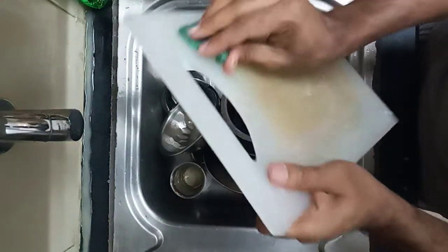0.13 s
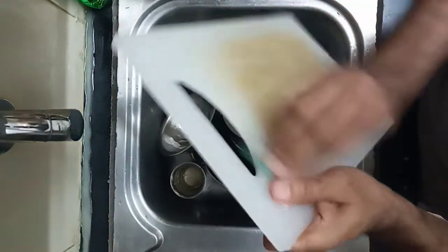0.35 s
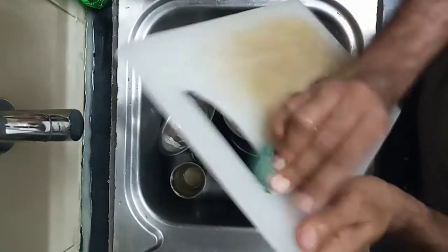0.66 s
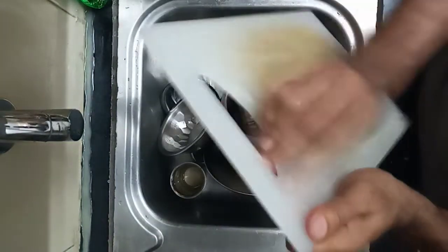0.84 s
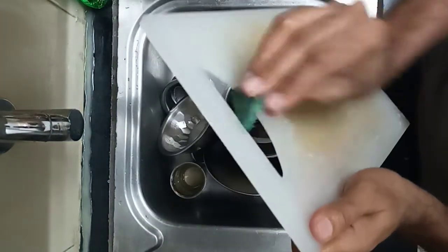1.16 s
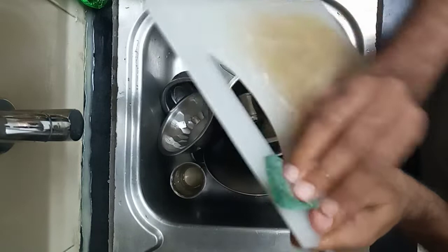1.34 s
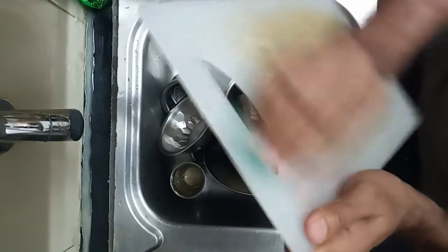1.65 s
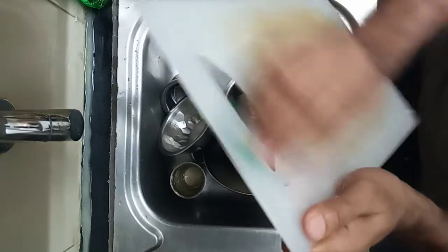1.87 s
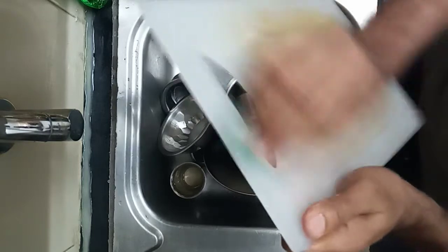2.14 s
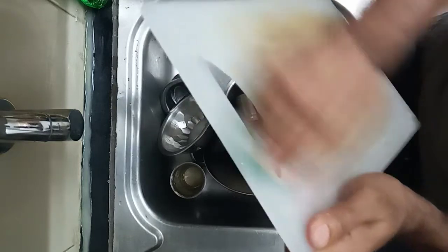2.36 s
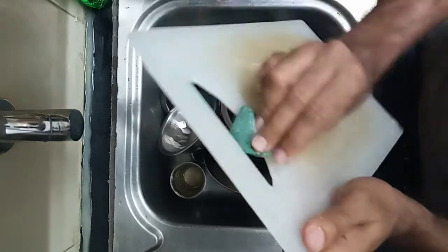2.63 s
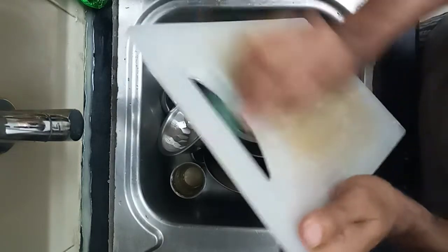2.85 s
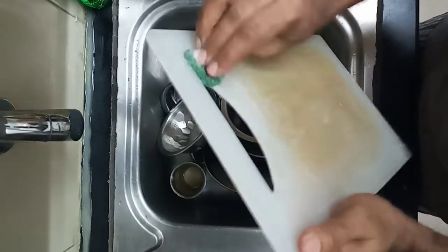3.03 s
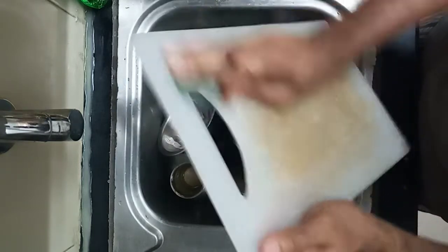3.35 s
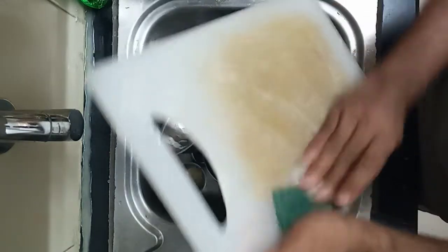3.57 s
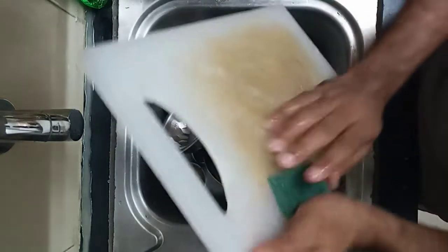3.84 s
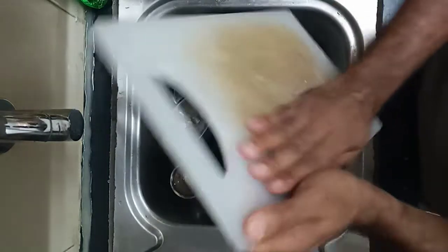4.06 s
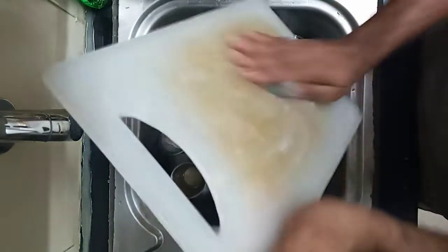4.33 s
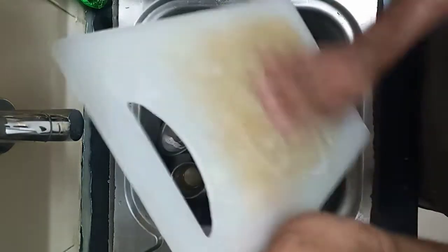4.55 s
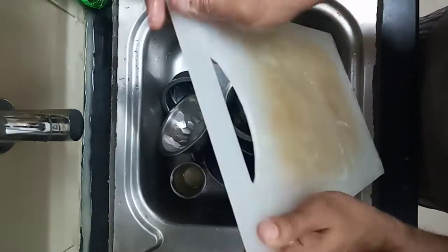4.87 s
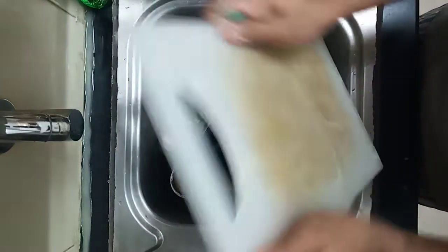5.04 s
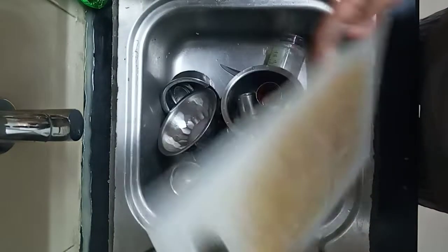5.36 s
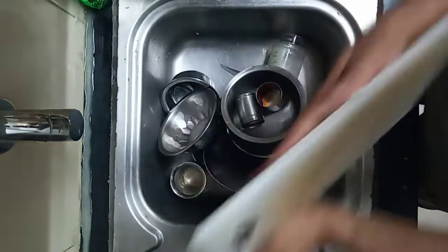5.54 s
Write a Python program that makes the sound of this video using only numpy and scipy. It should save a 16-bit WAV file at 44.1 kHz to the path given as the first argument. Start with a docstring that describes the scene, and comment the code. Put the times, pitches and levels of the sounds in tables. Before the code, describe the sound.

Brisk hissing scrub strokes on a plastic chopping board above a steel sink, pausing briefly, then long wet wipes with skin squeaks and knocks.

```python
"""A scouring pad goes quickly to and fro over a wet plastic chopping board, heard from close above a steel sink.
Then long wipes follow; the board also grates on the rim, knocks, and squeaks or rasps under wet skin.
Rubbing is made of tiny random slips, filtered to follow speed, pressure and the hollow under the hand.
Sink and small kitchen ring along with it; under it all throbs a low drone, like an engine outdoors,
made of one swelling tone and filtered noise."""
import sys
import numpy as np
from scipy import signal
from scipy.fft import rfft, irfft
from scipy.io import wavfile
from scipy.ndimage import uniform_filter1d

SR = 44100
rng = np.random.default_rng(int(sys.argv[2]) if len(sys.argv) > 2 else 0)


def bounce(signal):
    """Save signal as a 16-bit WAV file at the path given by the first command-line argument."""
    frames = np.transpose(np.atleast_2d(signal))
    limited = np.clip(frames, -1, 1)
    pcm = np.round(limited * 32767).astype(np.int16)
    wavfile.write(sys.argv[1], SR, pcm)


N = 251370
TIME = np.arange(N) / SR
SCRUB_END_S = 3.115  # the last quick stroke ends here


def amp(db):
    """Turns decibels into gain."""
    return 10 ** (np.asarray(db) / 20)


def unit(x):
    """Scales a sound to rms 1."""
    return x / np.sqrt(np.mean(x ** 2) + 1e-20)


def read(points, hz):
    """Reads a curve of frequency points, spaced as the ear hears pitch (log frequency)."""
    f, value = np.transpose(points)
    return np.interp(np.log(hz + 1), np.log(f + 1), value)


def follow(rows, t):
    """Reads every column of a time curve at the times t."""
    s, *columns = np.transpose(rows)
    return [np.interp(t, s, column) for column in columns]


def colour(x, points, share=1):
    """Filters a sound by a share of a spectrum in dB."""
    hz = np.fft.rfftfreq(2 * N, 1 / SR)
    gain = amp(share * read(points, hz))
    return irfft(rfft(x, 2 * N) * gain)[..., :N]


def wander(rate_hz):
    """Random drift of rms 1, with little movement faster than the given rate."""
    hz = np.fft.rfftfreq(N, 1 / SR)
    spectrum = rfft(rng.standard_normal(N)) / (1 + (hz / rate_hz) ** 4)
    return unit(irfft(spectrum, N))


def add(mix, s, sound):
    """Mixes a sound in at time s."""
    part = mix[:, max(round(s * SR), 0):][:, :sound.shape[-1]]
    part += sound[..., :part.shape[1]]


def swell(t, start, rise, hold, release_db_per_s):
    """Gain of one slide: a smooth rise, a hold, then a steady fall in dB."""
    attack = np.sin(np.pi / 2 * np.clip((t - start) / max(rise, .001), 0, 1)) ** 2
    return attack * amp(-release_db_per_s * np.maximum(t - start - rise - hold, 0))


# Quick strokes, to and fro in turn, each lasting until the next:
# (start [s], level [dB], fastest moment [share of the stroke], body at the start [dB], fizz [dB],
#  hollow under the hand [Hz], its glide [octaves])
QUICK_STROKES = [(0.01, -29.5, 0.42, -3.5, -6, 1570, 1.1), (0.167, -33.5, 0.5, -3, -1, 2140, 0.7),
                 (0.313, -32.5, 0.58, -5.5, -0.5, 1840, -0.2), (0.42, -34, 0.43, -6.5, -1, 2020, 0.2),
                 (0.542, -39, 0.28, -0.5, 0, 1510, 0), (0.653, -42.5, 0.2, -13.5, -2, 1450, -2),
                 (0.76, -59.5, 0.13, -13, -7, 1500, -0.21), (0.979, -57.5, .9, 2, 2, 1600, -4.5),
                 (1.087, -38, 0.64, -6.5, -1.5, 2180, 2.2), (1.24, -35.5, 0.4, -8.5, -1, 2200, -2.5),
                 (1.369, -36, .54, -4, -1, 2040, 1.8), (1.488, -34.5, .3, -12, -3, 1830, 0.1),
                 (1.609, -35, 0.43, -8, 0, 2880, 0.8), (1.723, -34, 0.19, -5, -.5, 2540, -2.2),
                 (1.834, -36, 0.38, -10, -1.5, 2540, 0.4), (1.952, -34.5, 0.098, -10, -4.5, 2050, 0),
                 (2.069, -33.5, 0.36, -10.5, -1, 2750, 0.8), (2.272, -35.5, 0.36, -9, -2.5, 1892, -2),
                 (2.429, -38, 0.29, -7.5, -3, 1940, 1.3), (2.55, -38.5, 0.47, -10, -2, 1965, 1.5),
                 (2.676, -38, 0.29, -6, 0.5, 2200, 2.2), (2.839, -44.5, 0.33, -6, -6.5, 2800, 0),
                 (2.998, -39.5, 0.63, -5.5, -2.5, 2750, -1.1)]
SETTLE_S, SETTLE_DB = 0.079, -11.5  # the pad first settles on the board
BITE, BRAKE, TURN_SPEED = 2.12, 1.38, 0.14  # curvature of run-up and slowing; speed left at the turn
BODY_GROWTH_DB = 9.5  # the board's body grows over a stroke
FIZZ_PER_SPEED = 0.12  # dB of fizz per dB of speed


def scrubbing():
    """The pad bites quickly and slows again in every stroke; it hisses at speed and growls as it is braked."""
    u = np.linspace(0, 1, num=41)[:-1]  # progress through one stroke
    rows = []
    ends = [row[0] for row in QUICK_STROKES[1:]] + [SCRUB_END_S]
    for stroke, end in zip(QUICK_STROKES, ends):
        start, db, crest, body_db, fizz_db, hollow_hz, glide_oct = stroke
        crest = np.clip(crest, .1, .9)
        speed = np.sin(np.pi * np.interp(u, [0, crest, 1], [0, .5, 1]))
        curvature = np.where(u < crest, BITE * crest, BRAKE)
        speed_db = 20 * np.log10(TURN_SPEED + speed ** curvature)
        glide = glide_oct * -np.cos(np.pi * u) / 2
        rows += list(zip(start + u * (end - start),
                         db + speed_db,
                         body_db + BODY_GROWTH_DB * u,
                         fizz_db + FIZZ_PER_SPEED * speed_db,
                         hollow_hz * 2 ** glide))
    slips = fibres(per_s=9000, spread_db=2.13, judder_db=0.94, likeness=0.18)
    rasp = rub(slips, *np.transpose(rows), hollow_db=4, drift_db=4.2)
    landing = amp(np.interp(TIME, [0, SETTLE_S], [SETTLE_DB, 0]))
    return rasp * landing * amp([[-.8], [.7]])


# Long wipes: (start [s], rise [s], hold [s], level [dB], body at full speed [dB], fizz [dB],
#  hollow under the hand at full speed [Hz], its strength [dB])
LONG_WIPES = [(3.092, 0.12, 0.033, -33.5, 2.5, -3.5, 1830, 3.5),
              (3.27, 0.034, 0.046, -46.5, -10.5, -1.5, 1480, 13),
              (3.569, 0.0046, 0.0071, -54, 4, 3.5, 1777, 3), (3.678, 0.041, 0.0028, -50.5, 2.5, 3, 1600, 3),
              (3.745, 0.13, 0.11, -34.5, -1.5, -0.5, 2140, 0.5),
              (3.977, 0.065, 0.092, -34.5, 8, -3, 2515, 6), (4.13, 0.045, 0.072, -36, 0.5, -5, 1550, 2),
              (4.256, 0.071, 0.056, -34, 0, -2, 2000, 7.5), (4.411, 0.029, 0.076, -41.5, -4.5, -4, 1820, 7),
              (4.689, 0.1, 0.04, -36.5, 4, 1, 2110, 4.5), (4.889, 0.05, 0.091, -49, -6, 1, 1880, 7.5),
              (5.144, 0.0094, 0.03, -38, -2.5, -8.5, 1700, 4.5),
              (5.171, 0.077, 0.093, -38, -5, -3.5, 1860, 8.5),
              (5.326, 0.14, 0.071, -38.5, 4.5, -2.5, 2870, 3.5), (5.537, 0.02, 0.095, -42, -5, -1, 2400, 5)]
WIPE_RELEASE_DB_PER_S = 217  # the hand eases off
WIPE_GLIDE_OCT_PER_S = -0.66  # its hollow opens as it goes
WIPE_BODY_DB_PER_S = 15  # the hand leans in as the sweep goes on
RESTING_DB, FIDGET_DB = -70, 1.5  # the hand never lies quite still on the board


def wiping():
    """Pad and palm rub the wet plastic in long sweeps, heard right of the middle and drifting towards it."""
    t = np.arange(SCRUB_END_S, N / SR, .002)
    start, rise, hold, db, body_db, fizz_db, hollow_hz, hollow_db = np.transpose(LONG_WIPES)[:, :, None]
    swells = [swell(t, *row[:3], WIPE_RELEASE_DB_PER_S) for row in LONG_WIPES]
    power = (amp(db) * swells) ** 2 + 1e-20
    age = np.clip(t - start - rise, -rise, hold)  # time since the sweep reached full speed
    tones = (body_db + WIPE_BODY_DB_PER_S * age,
             fizz_db,
             hollow_hz * 2 ** (WIPE_GLIDE_OCT_PER_S * age),
             hollow_db)
    # where sweeps overlap, the louder one sets the colour
    tone = [(column * power).sum(0) / power.sum(0) for column in tones]
    resting = amp(RESTING_DB + FIDGET_DB * np.interp(t, TIME, wander(10)))
    level_db = 10 * np.log10(power.sum(0) + resting ** 2)
    slips = fibres(per_s=12000, spread_db=2.5, judder_db=.5, likeness=0.2)
    sweep = rub(slips, t, level_db, *tone, drift_db=4.2)
    pan_db = np.interp(TIME, [3.9, 5.2], [-2.4, -.5])  # left against right
    return sweep * amp(np.array([pan_db, -pan_db]) / 2)


def fibres(per_s, spread_db, judder_db, likeness):
    """Countless tiny slips of uneven size, bunched by the pad's judder; the ports share some of them."""
    slips = (rng.random((3, N)) < per_s / SR) * rng.choice([-1., 1.], (3, N))
    size_db = spread_db * np.minimum(rng.exponential(1, (3, N)), 5)
    slips = unit(slips * amp(size_db))
    same = np.clip(likeness, 0, 1)
    mixed = np.sqrt(same) * slips[2] + np.sqrt(1 - same) * slips[:2]
    return unit(mixed * amp(judder_db * wander(43)))


# Rasp of fibres on plastic: (frequency [Hz], level [dB per Hz])
FIBRE_RASP = [(200, -20), (450, -23), (720, -11), (1100, -5.5), (1500, -6), (4400, -2), (6600, -0.5),
              (8700, -8), (10600, -2), (13600, -17.5), (14800, -4.5)]
# lower edge of the rasp over a 2200 Hz hollow; how closely it follows the hollow
CUTOFF_HZ, CUTOFF_FOLLOW = 1092, 0.37
PRESS_DB_PER_OCT = 35  # pressing harder pulls that edge down


def rub(slips, t, level_db, body_db, fizz_db, hollow_hz, hollow_db, drift_db):
    """Pressure brings out the board's body, speed the fizz, the cupped hand a moving resonance."""
    hz, frames, z = signal.stft(slips, SR, nperseg=512, noverlap=384)
    controls = (body_db, fizz_db, hollow_hz, hollow_db)
    body, fizz, hollow, cupped = (np.interp(frames, t, c * np.ones_like(t)) for c in controls)
    f = hz[:, None] + 1
    shape_db = read(FIBRE_RASP, f) + body / (1 + (f / 2200) ** 4) + fizz / (1 + (8300 / f) ** 8)
    peak = np.exp(-(np.log(f / hollow) / .36) ** 2)
    # the hollow radiates little below this edge
    cutoff = CUTOFF_HZ * (hollow / 2200) ** CUTOFF_FOLLOW * 2 ** (-body / PRESS_DB_PER_OCT)
    below_db = -10 / (1 + (f / cutoff) ** 14)
    # as the pad travels, reflections off hand and steel favour ever other narrow bands, mostly low ones
    drift = uniform_filter1d(rng.standard_normal(z.shape[1:]), size=2, axis=0)
    drift = unit(uniform_filter1d(drift, size=12, axis=1))
    drift_shape_db = drift_db * drift / np.sqrt(1 + (f / 4000) ** 2)
    shape = amp(shape_db + cupped * peak + below_db + drift_shape_db)
    # the level is set by the band from 2.5 to 8 kHz
    shape /= np.sqrt((shape[(hz > 2500) & (hz < 8000)] ** 2).sum(0) / len(hz))
    rubbed = signal.istft(z * shape, SR, nperseg=512, noverlap=384)[1][:, :N]
    return rubbed * amp(np.interp(TIME, t, level_db, -120, -120))


# The board grates on the rim of the sink: (start [s], rise [s], hold [s], level [dB])
RIM_GRATES = [(0.044, 0.022, 0.021, -27.5), (0.126, 0.022, 0.33, -53), (0.463, 0.092, 0.056, -48),
              (0.622, 0.036, 0.6, -58)]
GRATE_RELEASE_DB_PER_S = 478
RIM_HZ, RIM_WIDTH_HZ, RIM_DB = 797, 20, -3  # the note of the rim; its level against the grating


def grating():
    """The board's edge stutters along the steel rim, which sings one narrow note."""
    slips = fibres(per_s=3000, spread_db=2, judder_db=2, likeness=.6)
    # (frequency [Hz], level [dB])
    tone = [(100, -62), (235, 9), (330, -8.5), (400, -1), (560, -8.5), (1500, -4.0), (12000, -15.5)]
    note = signal.lfilter(*signal.iirpeak(RIM_HZ, RIM_HZ / RIM_WIDTH_HZ, SR), slips)
    contact = sum(amp(db) * swell(TIME, start, rise, hold, GRATE_RELEASE_DB_PER_S)
                  for start, rise, hold, db in RIM_GRATES)
    return unit(unit(colour(slips, tone)) + amp(RIM_DB) * unit(note)) * contact


# Wet skin drags on the board:
# (start [s], length [s], level [dB], resonance from [Hz], resonance to [Hz], its width [Hz])
SKIN_SCRAPES = [(0.347, 0.024, -41.5, 800, 810, 6.7), (2.0, .06, -49.5, 1400, 1084, 150),
                (3.192, 0.022, -37, 1720, 1620, 1450), (3.226, 0.036, -36, 1465, 1456, 420),
                (3.585, 0.026, -52, 1054, 1040, 4.7), (4.32, 0.096, -40, 1350, 1260, 500),
                (4.92, 0.086, -48, 1770, 1960, 290), (5.151, 0.0557, -46, 1590, 1675, 290),
                (5.3, 0.2, -46.5, 1546, 1456, 420)]


def scrapes():
    """Wet skin drags on the board and excites one gliding resonance: narrow, it squeaks; wide, it rasps."""
    out = np.zeros((2, N))
    for start, length, db, from_hz, to_hz, width_hz in SKIN_SCRAPES:
        u = np.arange(0, length, 1 / SR) / length
        grit = (wander(width_hz / 2) + 1j * wander(width_hz / 2))[:len(u)]
        turn = np.exp(2j * np.pi * np.cumsum(from_hz + (to_hz - from_hz) * u) / SR)
        add(out, start, amp(db) * np.sqrt(np.sin(np.pi * u)) * unit((grit * turn).real))
    return out


# Knocks of the board:
# (time [s], level [dB], main ring [Hz], time to fall 60 dB [s], tick against the ring [dB])
BOARD_KNOCKS = [(0.077, -43, 238, 0.056, -8), (0.606, -37.5, 219, 0.082, -14), (2.6, -50.5, 644, 0.11, -8),
                (3.71, -54, 200, 0.24, -10), (5.168, -47, 640, 0.063, 4)]


def knocks():
    """Each knock of the board is a short scuff of noise and a cluster of close, fading tones."""
    out, t = np.zeros((2, N)), np.arange(SR // 2) / SR
    cluster = [(.92, 0.076), (1, 1), (1.06, 0.72), (1.17, 1)]  # (factor on the pitch, share)
    for s, db, hz, t60, tick_db in BOARD_KNOCKS:
        ring = sum(share * np.sin(2 * np.pi * (hz * factor * t + rng.random())) for factor, share in cluster)
        ring *= amp(-60 * t / t60) * (1 - np.exp(-t / 0.0019))
        tick = rng.standard_normal((2, len(t))) * np.exp(-t / 0.027) * amp(tick_db) / 2
        add(out, s, amp(db) * (ring + tick))
    return out


# Short noise bursts: sharp clicks, and at 1.731 and 1.957 s the quick onset of a stroke:
# (time [s], peak level [dB])
NOISE_BURSTS = [(0.381, -25), (1.731, -24), (1.957, -33), (5.15, -26)]
BURST_DECAY_S = 0.00066


def bursts():
    """Short bursts of fast-fading noise: some are sharp clicks, others sharpen the quick onset of a stroke."""
    out, t = np.zeros((2, N)), np.arange(SR // 100) / SR
    for s, db in NOISE_BURSTS:
        burst = rng.standard_normal((2, len(t))) * np.exp(-t / BURST_DECAY_S)
        add(out, s, amp(db) * burst / abs(burst).max())
    return out


# Ringing of sink and dishes: (frequency [Hz], time to fall 60 dB [s], level [dB])
SINK_RINGS = [(406, 0.25, -7), (808, 0.16, 8.5), (1118, 0.26, 1), (1475, 0.07, -2), (2003, 0.11, 0.5),
              (2780, 0.041, -7), (6350, 0.067, -4)]


def sink(x, ring_db):
    """The steel bowl and the dishes in it ring along with the sound above them, as fading tones."""
    t = np.arange(SR // 2) / SR
    rings = sum(amp(db - 60 * t / t60) / t60 * np.cos(2 * np.pi * hz * t) for hz, t60, db in SINK_RINGS)
    response = rings[None] * 2 * np.log(1000) / SR
    return amp(ring_db) * signal.fftconvolve(x, response, axes=1)[:, :N]


# Echo of the kitchen: (frequency [Hz], time to fall 60 dB [s])
KITCHEN_ECHO = [(200, 0.2), (1000, 0.21), (4000, 0.17), (8000, 0.2), (15000, 0.082)]
TRAVEL_PER_S = 2.3  # pace of the changing echoes, in half turns


def kitchen(x, left_db, right_db, count=3):
    """A short dense tail whose echoes keep changing as the hand travels; the left port faces the room more."""
    t = np.arange(SR // 2) / SR
    echoes = rng.standard_normal((count, 2, len(t))) * (t > .004)
    hz, frames, z = signal.stft(echoes, SR, nperseg=256)
    fading = amp(-60 * frames / read(KITCHEN_ECHO, hz)[:, None])
    tails = signal.istft(z * fading, SR, nperseg=256)[1]
    tails /= np.linalg.norm(tails, axis=-1, keepdims=True)
    room = 0
    for k, tail in enumerate(tails):
        place = np.sqrt(2 / count) * np.cos(np.pi * (TRAVEL_PER_S * TIME + k / count))
        room = room + signal.fftconvolve(x * place, tail, axes=1)[:, :N]
    return amp([[left_db], [right_db]]) * room


# Loudness of the drone before its waver: (time [s], level [dB])
DRONE_LEVEL = [(0.02, -44), (0.2, -59), (0.45, -53.5), (0.65, -41), (1.15, -43.5), (1.36, -39), (1.54, -46),
               (1.6, -40.5), (1.68, -62), (1.91, -54), (1.99, -75), (2.08, -58), (2.16, -77), (2.39, -72),
               (2.53, -51), (2.89, -45), (3.13, -58.5), (3.72, -53.5), (3.78, -57.5), (4.82, -45),
               (4.86, -58), (5.05, -46), (5.1, -61), (5.28, -42), (5.45, -73)]
# Engine speed: (time [s], drone pitch before its waver [Hz], throb depth [0-1])
ENGINE_SPEED = [(0, 121.8, 1), (0.65, 122.3, 0.68), (1.2, 121.5, 0.2), (1.4, 135, 0.45),
                (1.65, 117.8, 0.68), (2.85, 125.6, 0.73), (4.45, 120.3, 0.75), (5.25, 127.8, 0.05)]
DRONE_WAVER_DB = 2.6  # at full throb depth
# the thirteenth harmonic: level, then (start s, rise s, hold s, release dB per s)
OVERTONE_DB, OVERTONE_SWELL = -49.5, (0.5, 0.5, 0, 250)


def drone(order=7):
    """Each beat of the engine swells one low boom, its seventh harmonic; a higher one comes through briefly."""
    pitch_hz, depth = follow(ENGINE_SPEED, TIME)
    depth = np.clip(depth, 0, 1)
    angle = 2 * np.pi * np.cumsum(pitch_hz * (1 + 0.011 * wander(19.0))) / SR
    throb = 1 + depth * np.cos(angle / order)
    boom = throb * np.sin(angle) / np.sqrt(.5 + depth ** 2 / 4)
    # (frequency [Hz], level [dB])
    rumble_tone = [(40, -29), (85, -3.0), (135, -4.0), (175, -14.0), (500, -32)]
    rumble = unit(colour(rng.standard_normal(N), rumble_tone))
    level_db = follow(DRONE_LEVEL, TIME)[0] + DRONE_WAVER_DB * depth ** 2 * wander(7)
    sound = (boom + .9 * depth ** 2 * rumble) * amp(level_db)
    overtone = amp(OVERTONE_DB) * swell(TIME, *OVERTONE_SWELL) * np.sin(angle * (2 - 1 / order))
    return (sound + overtone) * amp([[-.8], [-3.3]])


# Colour of the still air of the house: (frequency [Hz], relative level [dB per Hz])
HOUSE_AIR = [(20, -28), (90, 14.5), (340, -2.5), (405, 5), (470, -10.5), (620, 3.5), (2600, -10),
             (7000, -10.5), (16000, -67)]


def air():
    """Faint steady background of the house, made of filtered noise."""
    return amp(-60.5) * unit(colour(rng.standard_normal((2, N)), HOUSE_AIR))


PORT_LAG_S = 0.001439  # the direct sound, bowl and drone reach the left port later


def scene():
    """All handwork sounds straight and in the room; the rubbing also rings the sink, over drone and air."""
    rubbed = scrubbing() + wiping()
    work = rubbed + grating() + scrapes() + knocks() + bursts()
    bowl = sink(rubbed, ring_db=1)
    room = kitchen(work, left_db=-2.0, right_db=-11.0)
    left, right = amp(-1.76) * work + bowl + drone()
    lagged = np.roll(left, round(PORT_LAG_S * SR))
    return np.array([lagged, right]) + room + air()


# Colour of the two microphone ports, applied by a share in each: (frequency [Hz], left against right [dB])
PORT_COLOUR = [(110, 8), (260, 5), (700, 5), (2000, 2), (3500, 1.5), (5000, -4.5), (6300, -1.5),
               (7800, 3.5), (8800, -6), (10400, -22), (14000, -15), (15200, -5.5)]
EDGE_HZ = 15850  # upper edge of the sound


def record(dry):
    """Each port has its own colour; then a low-pass filter limits the band."""
    heard = np.array([colour(dry[0], PORT_COLOUR, share=0.77), colour(dry[1], PORT_COLOUR, share=-0.15)])
    low_pass = signal.firwin(511, EDGE_HZ, window=("kaiser", 9), fs=SR)
    return signal.oaconvolve(heard, low_pass[None], "same")


dry = scene()
out = record(dry)
bounce(out)
```